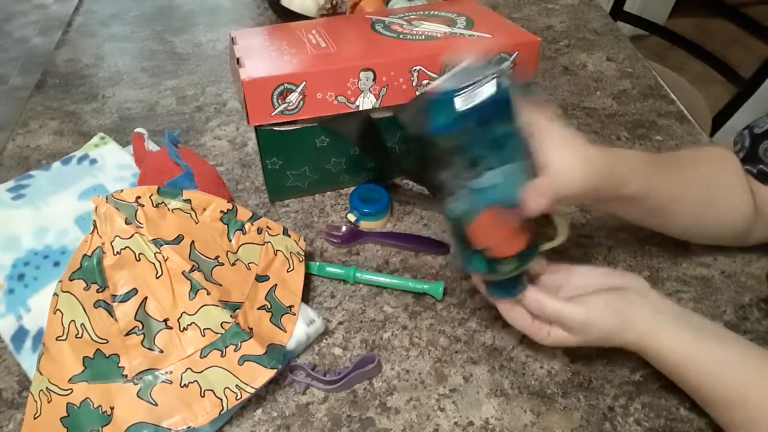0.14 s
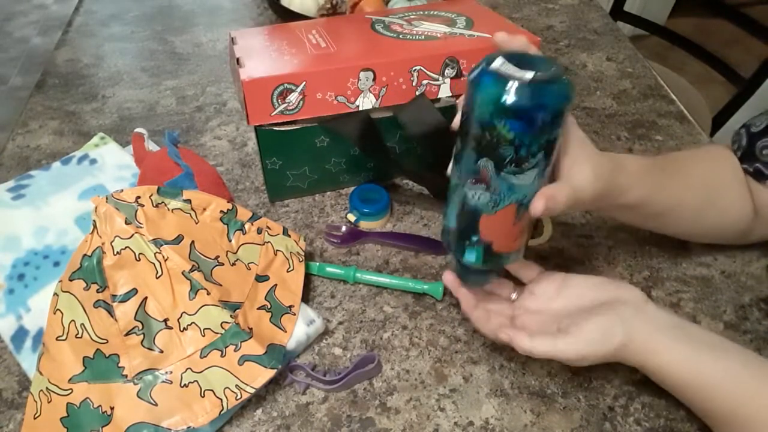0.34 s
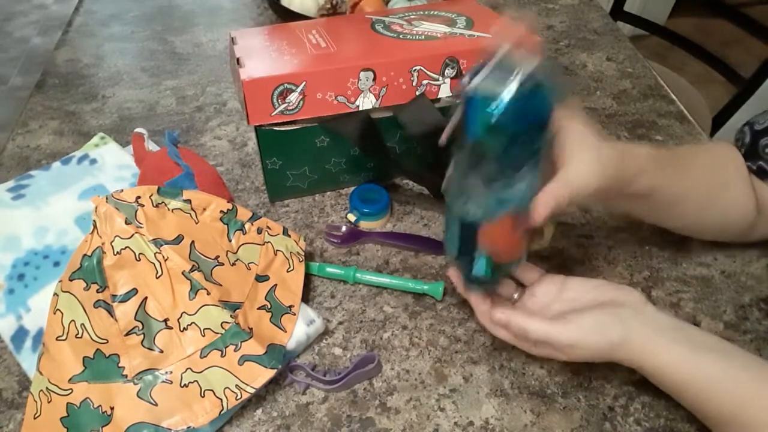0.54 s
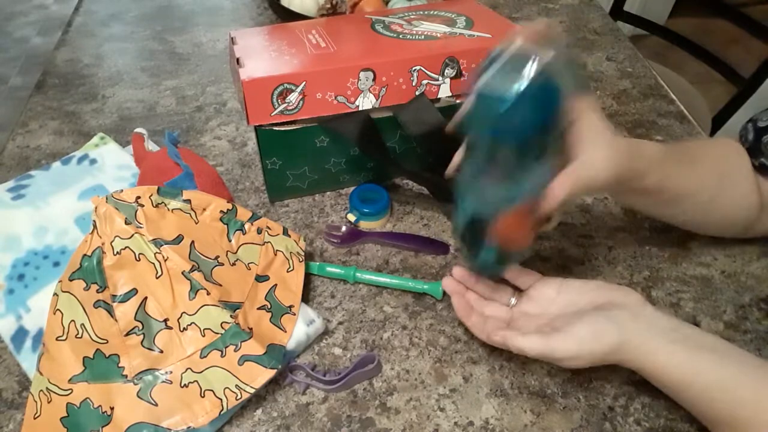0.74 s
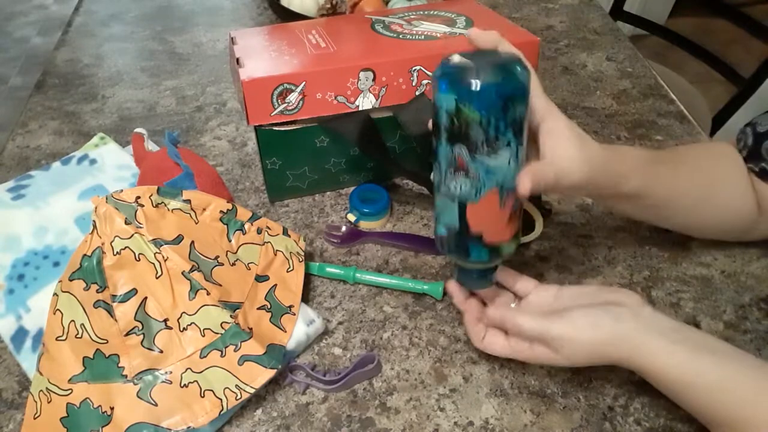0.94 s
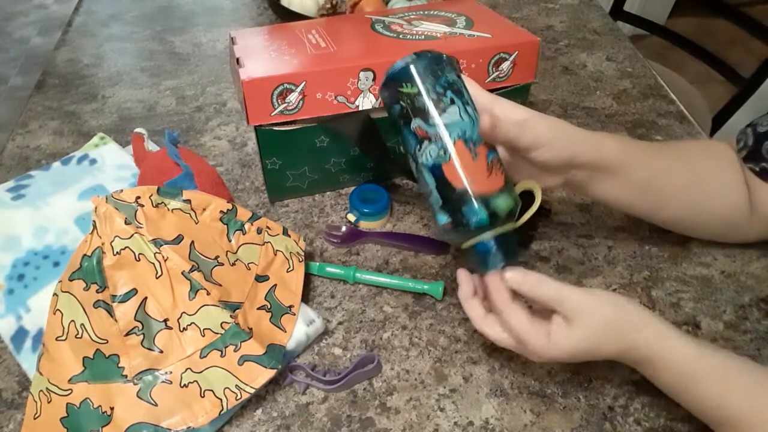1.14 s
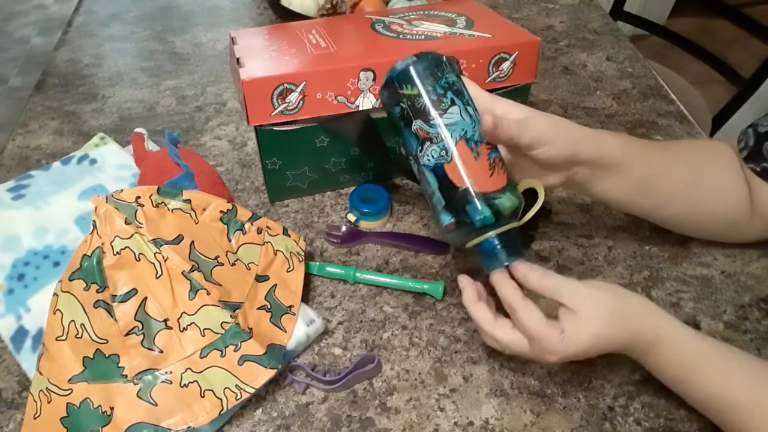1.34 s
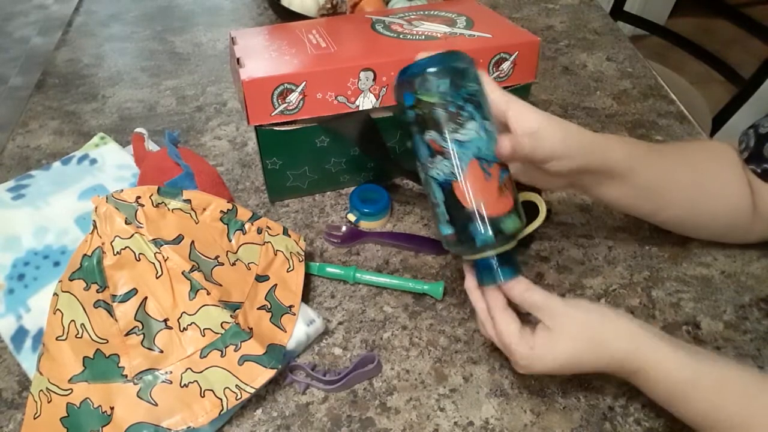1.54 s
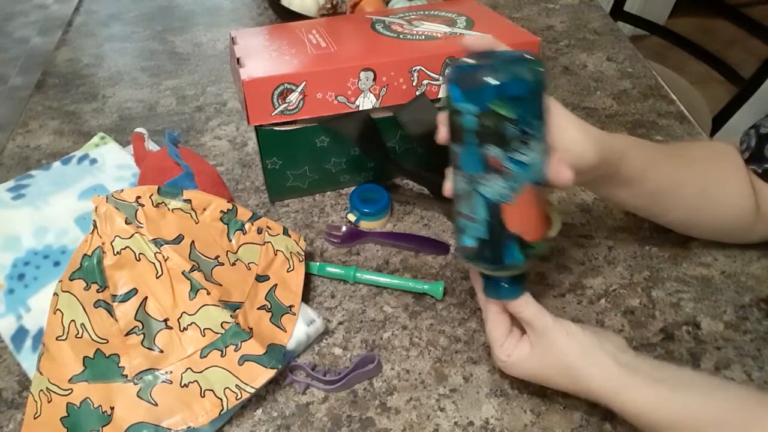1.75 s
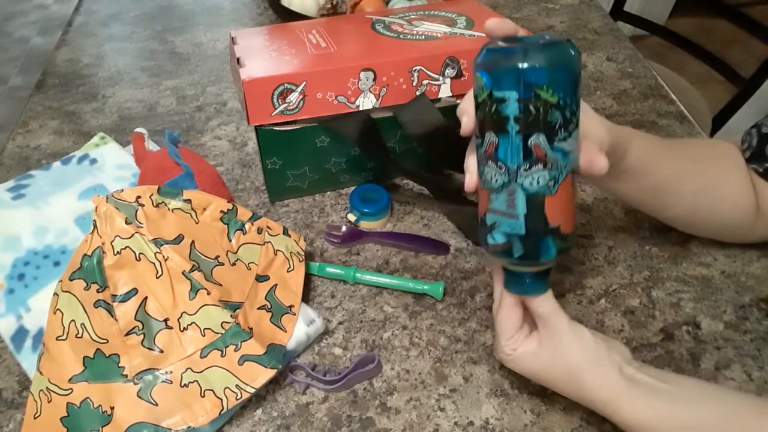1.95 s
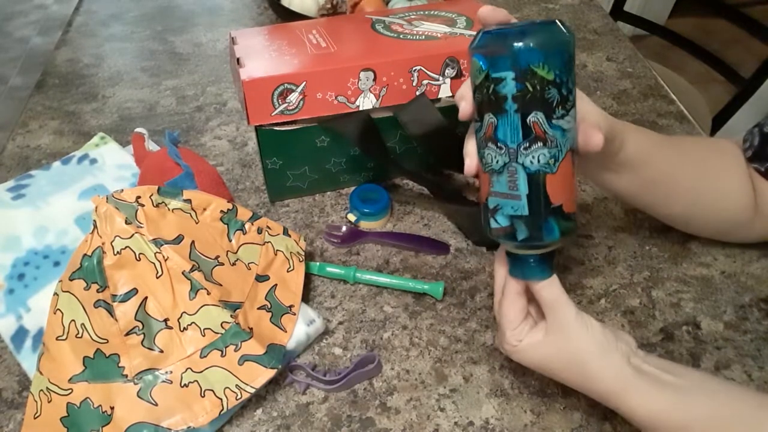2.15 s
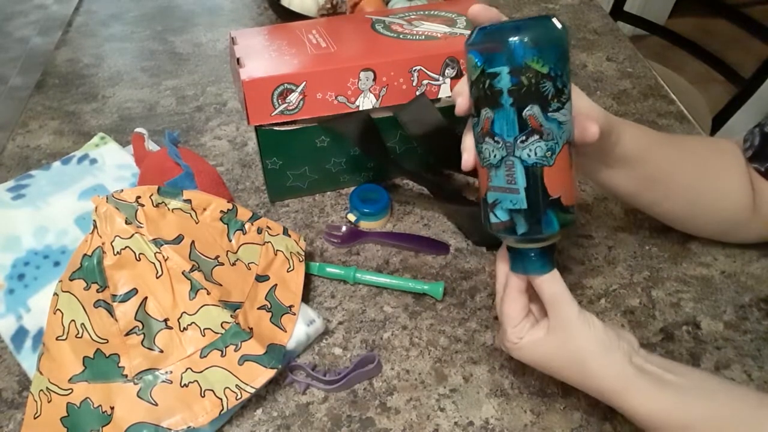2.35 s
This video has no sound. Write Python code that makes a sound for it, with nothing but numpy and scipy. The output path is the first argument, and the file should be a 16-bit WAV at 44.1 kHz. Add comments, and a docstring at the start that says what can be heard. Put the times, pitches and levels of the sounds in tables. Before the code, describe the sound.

Small hard pieces clatter inside a hollow plastic bottle, shaken in uneven bursts for about a second, then nearly still with soft finger taps and one small drop; close microphone, small room, faint hum.

```python
"""In a small room, a few small hard objects clatter inside an upturned plastic bottle.
It is shaken for a second and then held still. Each blow is a sharp click, a hollow knock of the wall and a
low thump of the whole bottle: bursts of noise plus fading tones. The loose pieces jostle as random ticks.
Later fingers slip over the plastic and nudge the bottle with soft taps, and one last piece drops.
A faint room noise with a wavering hum lies under it all."""
import sys
import numpy as np
from scipy import signal
from scipy.fft import rfft, irfft, next_fast_len
from scipy.io import wavfile
from scipy.ndimage import uniform_filter1d, map_coordinates

SR = 44100
rng = np.random.default_rng(int(sys.argv[2]) if len(sys.argv) > 2 else 0)


def transcribe(u):
    """Save the signal u as a 16-bit wav file named by the first command-line argument.

    u: samples, shape (n,) or (channels, n), limited to [-1, 1]; the rate is SR.
    q: integer samples, one column per channel.
    """
    v = np.clip(np.atleast_2d(u).T, -1, 1)
    q = np.round(v * 32767).astype(np.int16)
    wavfile.write(sys.argv[1], SR, q)


N = 105840  # samples, 2.4 s


def amp(db):
    """Decibels to gain."""
    return 10 ** (np.asarray(db) / 20)


def unit(x):
    """Scale to an rms (average strength) of 1."""
    return x / np.sqrt(np.mean(x ** 2) + 1e-20)


def along(points, hz):
    """Read a table of (f/Hz, value) at any pitch, with straight lines on a log pitch axis."""
    f, v = np.transpose(points)
    return np.interp(np.log(hz + 1), np.log(f + 1), v)


def curve(rows):
    """Turn a table of (t/s, value) into one value per sample."""
    return np.interp(np.arange(N) / SR, *np.transpose(rows))


def wobble(rate):
    """A smooth random curve through `rate` random points a second."""
    knots = rng.standard_normal(int(N * rate / SR) + 4)
    return map_coordinates(knots, [np.arange(N) * rate / SR])


def filtered(x, gain):
    """Filter x by a gain for each pitch; the minimum-phase filter adds no sound ahead of time."""
    n = x.shape[-1]
    m = 2 * next_fast_len(n // 2 + 2048)
    log_gain = np.log(np.maximum(gain(np.fft.rfftfreq(m, 1 / SR)), 1e-6))
    # folding the cepstrum onto positive times makes the filter causal
    cepstrum = irfft(log_gain, m)
    cepstrum[..., 1:m // 2] *= 2
    cepstrum[..., m // 2 + 1:] = 0
    response = np.exp(rfft(cepstrum))
    return irfft(rfft(x, m) * response, m)[..., :n]


def coloured(x, spectrum):
    """Give x the tone colour of a (f/Hz, level/dB) table."""
    return filtered(x, lambda hz: amp(along(spectrum, hz)))


def pair(n, alike):
    """Left and right noise; a shared part and an opposite part set how alike they are."""
    likeness = np.clip(along(alike, np.fft.rfftfreq(n, 1 / SR)), -1, 1)
    turn = np.arccos(likeness) / 2
    noise = rfft(rng.standard_normal((2, n)))
    mid, side = irfft(noise * [np.cos(turn), np.sin(turn)], n)
    return np.array([mid + side, mid - side])


def add(track, s, sound):
    """Mix a sound into the track at time s, in seconds."""
    part = track[:, max(round(s * SR), 0):][:, :sound.shape[-1]]
    part += sound[:, :part.shape[-1]]


# where the direct sound sits: f/Hz, level/dB (left minus right)
BALANCE = [(250, -4), (1200, -3), (2300, -4.5), (4700, -6), (7000, 1), (13000, -2)]
# how long the room takes to fade by 60 dB: f/Hz, t/s
ROOM_FADE = [(1000, 0.43), (7000, 0.3), (15000, 0.2)]
# strength of the room tail: f/Hz, level/dB
ROOM_COLOUR = [(280, -10.5), (600, 1), (2000, -8), (6000, -5.5)]
# left-right likeness of the room sound: f/Hz, likeness (1 = same)
ROOM_ALIKE = [(250, 0.85), (600, 0.73), (1500, .15), (8000, 0.068)]
ROOM_BUILD_S, ROOM_PAN_DB = 0.002, -2.5  # pan is left minus right


def in_room(x, room_db=0):
    """Place a sound a little to the right; the room answers with noise that fades band by band."""
    n = SR // 2
    hz, t, z = signal.stft(pair(n, ROOM_ALIKE), SR, nperseg=256)
    fade = amp(-60 * t / along(ROOM_FADE, hz)[:, None]) * (1 - np.exp(-t / ROOM_BUILD_S))
    energy = n * np.mean(fade ** 2, axis=1, keepdims=True)
    fade *= amp(along(ROOM_COLOUR, hz))[:, None] / np.sqrt(energy)
    tail = signal.istft(z * fade, SR, nperseg=256)[1]
    pan = amp([[ROOM_PAN_DB / 2], [-ROOM_PAN_DB / 2]])
    heard = signal.fftconvolve(x, tail, axes=1) * amp(room_db) * pan
    direct = filtered(x, lambda hz: amp(np.outer([.5, -.5], along(BALANCE, hz))))
    add(heard, 0, direct)
    return heard


def mode(t, hz, t60):
    """One fading tone, 60 dB down after t60 seconds, its phase a little different at each ear."""
    phase = 2 * np.pi * (hz * t + rng.random()) + .5 * rng.standard_normal((2, 1))
    return amp(-60 * t / t60) * np.sin(phase)


# left-right likeness of the bottle noises: f/Hz, likeness (1 = same)
BOTTLE_ALIKE = [(600, 0.95), (2000, 0.46), (5000, 0.15)]
CONTACT_FALL = 1.7  # steepness of a contact's end
INSIDE_DB, INSIDE_T60_S = -21, .06  # sound bouncing inside the bottle


def contact(t, length_s, spectrum):
    """A noise burst for many quickly damped plastic modes, with a brief echo inside the bottle."""
    hit = 1 / (1 + (t / length_s) ** (2 * CONTACT_FALL))
    shape = hit + amp(INSIDE_DB - 60 * t / INSIDE_T60_S)
    raw = pair(len(t), BOTTLE_ALIKE) * shape
    power = np.mean(np.abs(rfft(raw)) ** 2, axis=0)
    smooth_power = np.abs(uniform_filter1d(power, size=len(t) // 50))
    raw_hz = np.fft.rfftfreq(len(t), 1 / SR)

    def gain(hz):
        """Even out broad bands but keep the fine peaks, then apply the colour."""
        return np.interp(hz, raw_hz, smooth_power) ** -.5 * amp(along(spectrum, hz))

    return unit(filtered(raw, gain)) * np.sqrt(np.mean(shape ** 2))


# colour of the room noise, before its level is set: f/Hz, level/dB
AIR_COLOUR = [(25, -32.5), (100, -16), (200, -4.5), (300, -8.5), (600, -10), (800, -19.5), (1500, -23.5),
              (2050, -15), (2500, -25.5), (3800, -31), (5100, -28), (5900, -32.5), (6900, -30),
              (8000, -41.5)]
# level of the room noise over time: t/s, level/dB
AIR_LEVEL = [(0, -55), (.9, -56.5), (1.3, -68.5), (1.55, -69), (2.1, -63), (2.3, -57), (2.4, -59)]
# tones of the hum: f/Hz, level/dB (over the room noise)
HUM = [(202, -7), (410, -4.5)]
HUM_WAVER = .25  # typical phase drift, radians


def background(pan_db=-3):
    """Coloured noise plus a hum of sines with drifting phase; their level sinks and partly returns."""
    t = np.arange(N) / SR
    hum = 0
    for hz, db in HUM:
        tone = np.sin(2 * np.pi * hz * t + HUM_WAVER * wobble(8))
        hum = hum + amp(db) * np.sqrt(2) * tone
    air = unit(coloured(pair(N, ROOM_ALIKE), AIR_COLOUR))
    pan = amp([[pan_db / 2], [-pan_db / 2]])
    return (air + hum) * amp(curve(AIR_LEVEL)) * pan


# colour of the finger's swish, before its level is set: f/Hz, level/dB
SLIDE_COLOUR = [(300, -13), (1200, 4), (4000, -14), (8000, 1), (16000, -14)]
SLIDE_S, SLIDE_LENGTH_S, SLIDE_DB = 1.455, .028, -74  # middle, spread and level


def slide():
    """Skin slips over the plastic: a faint swish of noise that swells and fades in a bell shape."""
    swell = np.exp(-.5 * ((np.arange(N) / SR - SLIDE_S) / SLIDE_LENGTH_S) ** 2)
    return amp(SLIDE_DB) * swell * unit(coloured(pair(N, BOTTLE_ALIKE), SLIDE_COLOUR))


# fingers nudging the bottle: t/s, level/dB, f/Hz (pitch of the tap)
NUDGES = [(1.409, -64.5, 2336), (1.595, -67, 1756), (1.618, -64.5, 1787), (1.667, -66, 1764),
          (1.769, -57, 1790), (1.811, -58, 1760), (2.320, -59.5, 1740), (2.338, -55.5, 1800)]
# colour of a nudge's noise: f/Hz, level/dB
NUDGE_COLOUR = [(100, -20), (500, 0), (2200, 7), (3300, -24), (16000, -48)]


def nudges(length_s=0.0051, ring_t60_s=0.045):
    """Soft taps as the fingers shift: a short noise burst and one quickly fading tone."""
    out, t = np.zeros((2, N)), np.arange(SR // 8) / SR
    for s, db, hz in NUDGES:
        tap = .5 * contact(t, length_s, NUDGE_COLOUR) + np.sqrt(2) * mode(t, hz, ring_t60_s)
        add(out, s, in_room(amp(db) * tap))
    return out


# colour of the last piece's drop: f/Hz, level/dB
DROP_COLOUR = [(80, -30), (900, -4), (1500, -3.5), (2500, 4.5), (3200, -7), (4100, -2), (7000, -9),
               (9000, -24), (16000, -39)]
DROP_S, DROP_DB, DROP_LENGTH_S = 1.8283, -36.5, 0.0023


def last_drop(room_db=1.5):
    """A last piece drops into the neck, damped by the fingers: a noise burst with no ringing tone."""
    out, t = np.zeros((2, N)), np.arange(SR // 8) / SR
    add(out, DROP_S, in_room(amp(DROP_DB) * contact(t, DROP_LENGTH_S, DROP_COLOUR), room_db))
    return out


# level of the loose pieces over time: t/s, level/dB
JOSTLE_LEVEL = [(.17, -67), (.234, -46.5), (.243, -25.5), (.28, -23), (.34, -37), (.44, -48), (.62, -54),
                (.68, -36), (.78, -40.5), (.83, -28.5), (.93, -48), (1.22, -76)]
# colour of a hollow knock, also used by the blows: f/Hz, level/dB
KNOCK_COLOUR = [(60, -50), (550, -19.5), (1300, -8), (1690, 3), (2000, -4), (2380, 1.5), (2800, -9),
                (3230, -3), (4500, -24), (16000, -46)]
# colour of a sharp click, also used by the blows: f/Hz, level/dB
CLICK_COLOUR = [(60, -40), (500, -12.5), (1500, -10), (2800, -4), (3900, 0.5), (7100, -2), (7700, -9.5),
                (16000, -21.5)]
KNOCK_S, CLICK_S = .003, .0027  # length of a contact
JOSTLE_PER_S, JOSTLE_SCATTER_DB = 400, 2


def jostle(knock_db=-2):
    """Light touches of the loose pieces: ticks of fading noise at random times and strengths."""
    scatter_db = JOSTLE_SCATTER_DB * np.clip(rng.standard_normal(N), -2, 2)
    touches = (rng.random(N) < JOSTLE_PER_S / SR) * amp(scatter_db)
    # every touch starts a quick fade
    shape = unit(signal.lfilter([1], [1, -np.exp(-2 / (CLICK_S * SR))], touches))
    clicks = unit(coloured(shape * pair(N, BOTTLE_ALIKE), CLICK_COLOUR))
    knocks = unit(coloured(shape * pair(N, BOTTLE_ALIKE), KNOCK_COLOUR))
    ticks = unit(clicks + amp(knock_db) * knocks)
    t = np.arange(N) / SR
    shaking = (t > JOSTLE_LEVEL[0][0]) & (t < JOSTLE_LEVEL[-1][0])
    return in_room(ticks * amp(curve(JOSTLE_LEVEL)) * shaking)[:, :N]


# blows on the wall: t/s, knock level/dB, click level/dB, thump level/dB,
# spot f/Hz (pitch of the place struck), thump f/Hz
BLOWS = [(0.2382, -14, -14.5, -20.5, 3260, 283.6), (0.2452, -18, -21.5, -25.5, 2300, 295),
         (.2530, -19.5, -16.5, -30.5, 6000, 287), (.2570, -18.5, -18.5, -33, 1720, 280),
         (0.2654, -9.5, -15, -19, 3290, 284), (0.2701, -18, -18.5, -30, 2300, 284),
         (.2790, -24.5, -21, -32.5, 6200, 280), (0.3051, -21, -24, -33.5, 7070, 267),
         (0.3117, -19.5, -16, -14, 1720, 272), (0.4053, -22.5, -22, -31.5, 3198, 266),
         (.4200, -31.5, -33, -37, 1780, 275), (0.4504, -29, -25.5, -32.5, 3550, 263.2),
         (.5490, -34, -28.5, -36.5, 6400, 258), (0.5543, -28, -22, -29.5, 4030, 260),
         (.6370, -22.5, -22.5, -28, 2150, 307), (.6400, -17, -21.5, -25, 1695, 297.4),
         (0.6643, -9.5, -17, -20, 2710, 289), (.7280, -24, -19.5, -21.5, 7150, 260.6),
         (0.7327, -22.5, -15, -34, 5450, 253), (.8010, -14.5, -14, -20, 5400, 269.4),
         (0.8098, -25.5, -20, -27.5, 3340, 286), (0.8396, -17.5, -26.5, -25, 2330, 291),
         (0.8844, -21, -28, -23, 1900, 268.4), (.9093, -27, -24, -29.5, 2300, 246),
         (0.923, -27, -18.5, -36.5, 3930, 292), (.9750, -47, -51, -38.5, 2300, 247),
         (1.051, -40, -37.5, -50, 3730, 230), (1.117, -53, -55, -50, 1996, 224.6)]
# ringing tones of the wall: f/Hz, level/dB (before WALL_DB), t/s (60 dB fade, before the cap below)
WALL = [(825, -14, .25), (1537, -3.5, .08), (1678, 3, .13), (1748, 0, 0.18), (2155, -9.5, .25),
        (2298, -1, .18), (2430, -4, .12), (2480, -5, .17), (3250, 1, 0.12), (3543, -10, .25)]
WALL_DB, MODE_SCATTER_DB, WALL_LONGEST_S = -18.5, 3, .18  # the last caps the fade times
SPOT_DB, SPOT_T60_S = -3, .045  # ring of the spot struck
THUMP_T60_S, THUMP_RISE_S = 0.08, 0.002


def wall_ring(t):
    """The wall's tones ring together, their strengths a little different at each blow."""
    ring = 0
    for hz, db, t60 in WALL:
        strength = amp(db + MODE_SCATTER_DB * rng.normal())
        ring = ring + strength * mode(t, hz, min(t60, WALL_LONGEST_S))
    return ring


def blows():
    """Each blow clicks, knocks, rings its own spot and the wall, and thumps the whole bottle."""
    out, t = np.zeros((2, N)), np.arange(SR // 4) / SR
    thump_shape = amp(-60 * t / THUMP_T60_S) * (1 - np.exp(-t / THUMP_RISE_S)) ** 2
    for s, knock_db, click_db, thump_db, spot_hz, thump_hz in BLOWS:
        knock = contact(t, KNOCK_S, KNOCK_COLOUR) + amp(WALL_DB) * wall_ring(t)
        click = contact(t, CLICK_S, CLICK_COLOUR)
        thump = np.sin(2 * np.pi * thump_hz * t) * thump_shape
        # the spot rings as strongly as knock and click together are at its pitch
        knock_drive = amp(knock_db + along(KNOCK_COLOUR, spot_hz))
        click_drive = amp(click_db + along(CLICK_COLOUR, spot_hz))
        spot = amp(SPOT_DB) * np.hypot(knock_drive, click_drive) * mode(t, spot_hz, SPOT_T60_S)
        blow = amp(knock_db) * knock + amp(click_db) * click + spot + amp(thump_db) * thump
        add(out, s, in_room(blow))
    return out


def scene():
    """The room, the fingers, the loose pieces and the blows together."""
    return background() + slide() + nudges() + last_drop() + jostle() + blows()


TOP_HZ = 16200  # band limit


def record(dry):
    """Round off the loudest peaks, then cut steeply above the band limit."""
    soft = dry / (1 + np.abs(dry) ** 6) ** (1 / 6)
    m = next_fast_len(N + SR // 2)
    cut = 1 + (np.fft.rfftfreq(m, 1 / SR) / TOP_HZ) ** 120
    return irfft(rfft(soft, m) / cut, m)[:, :N]


dry = scene()
out = record(dry)
transcribe(out)
```